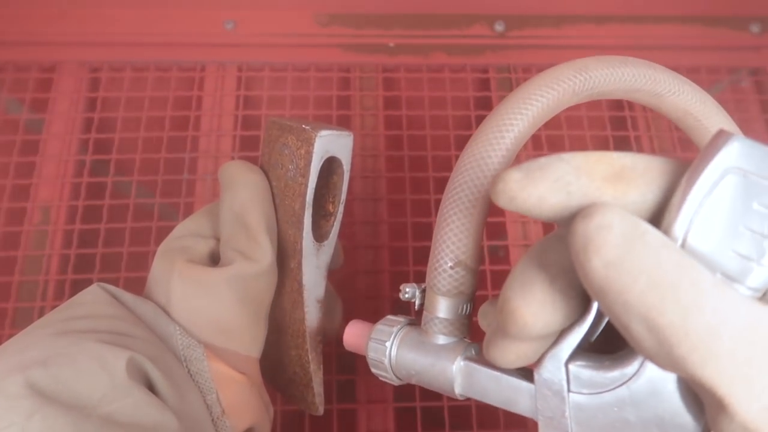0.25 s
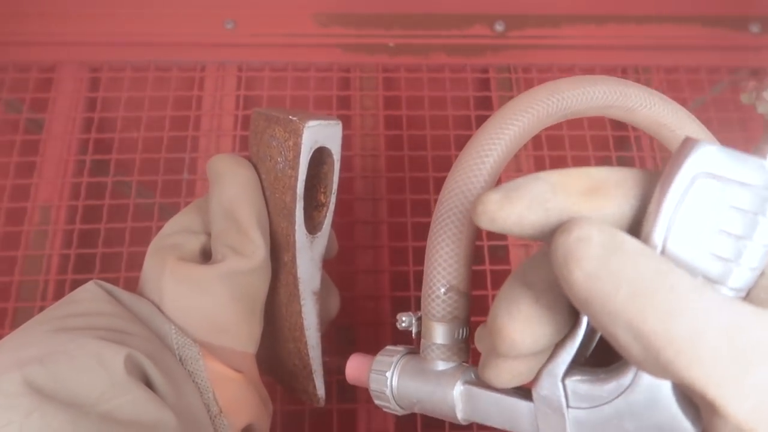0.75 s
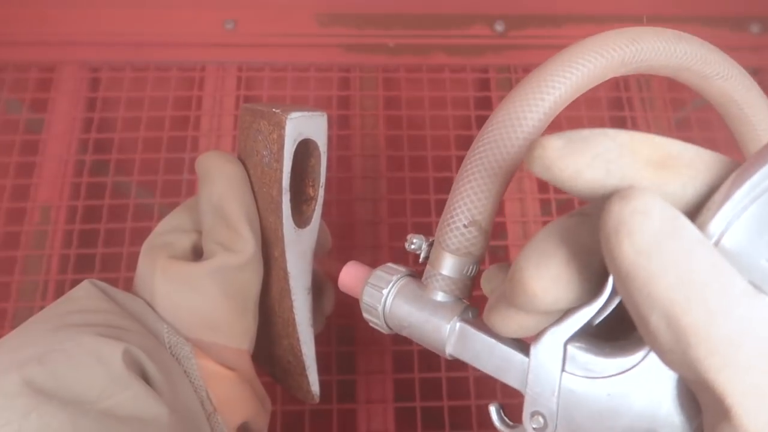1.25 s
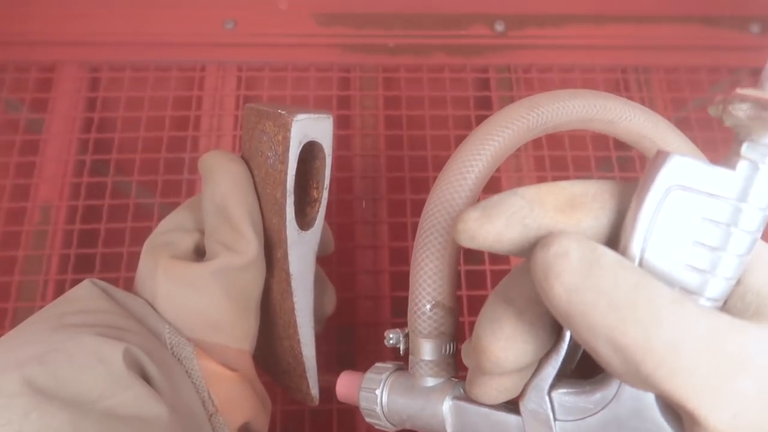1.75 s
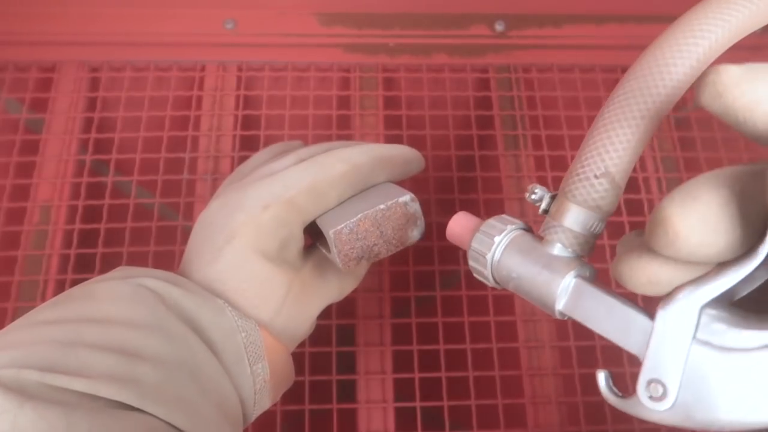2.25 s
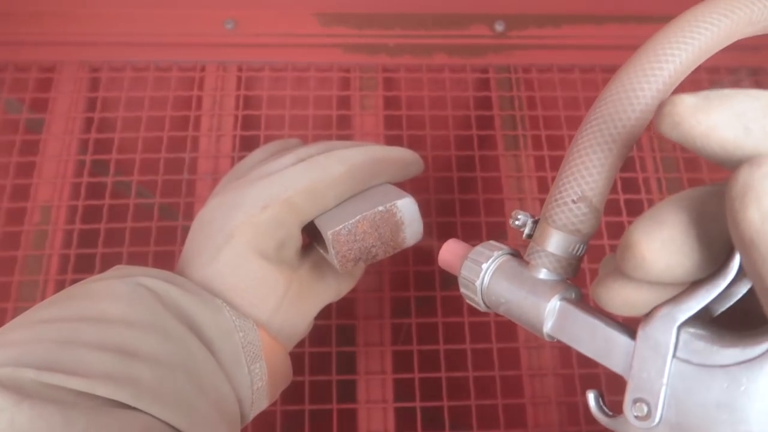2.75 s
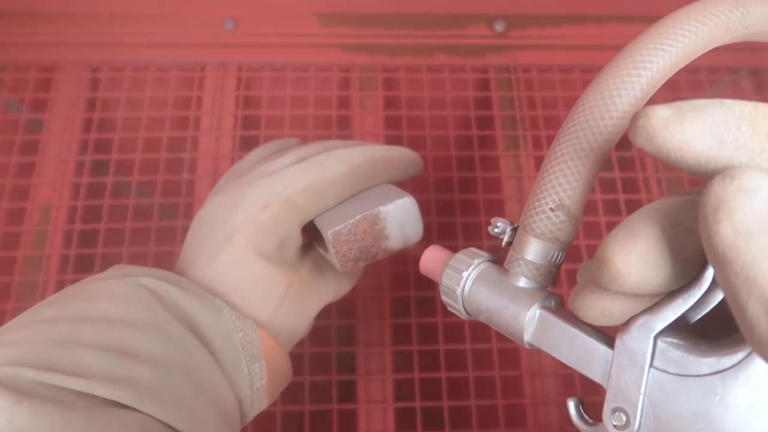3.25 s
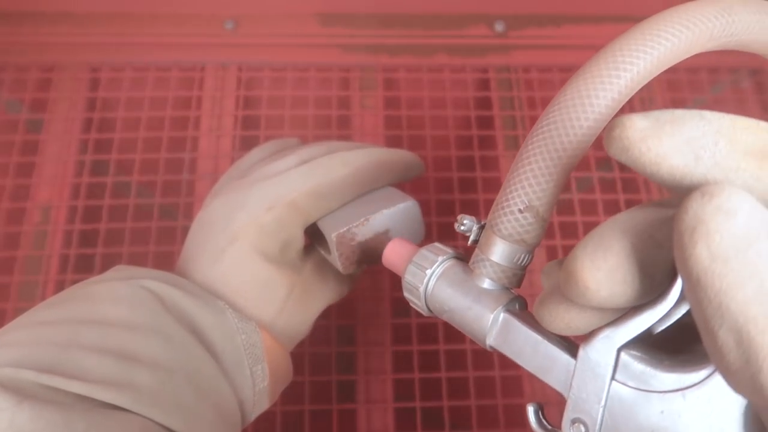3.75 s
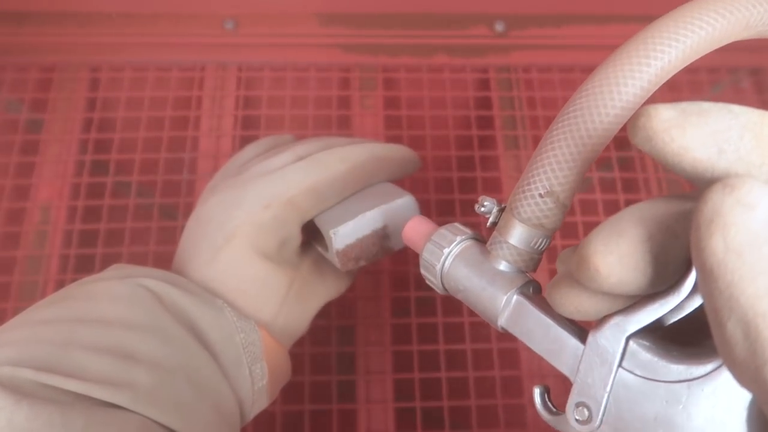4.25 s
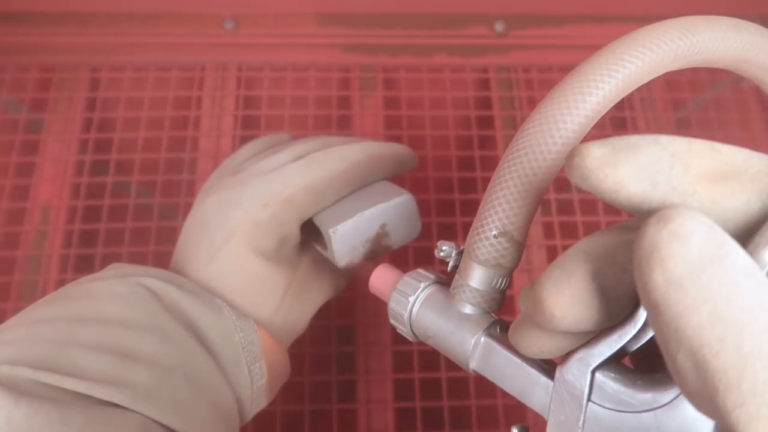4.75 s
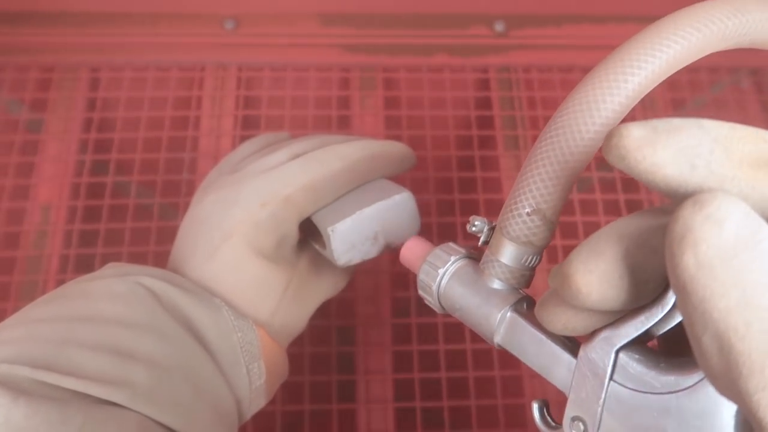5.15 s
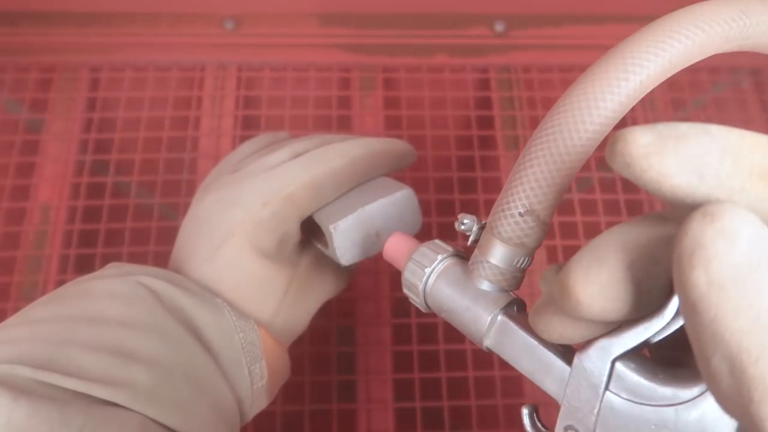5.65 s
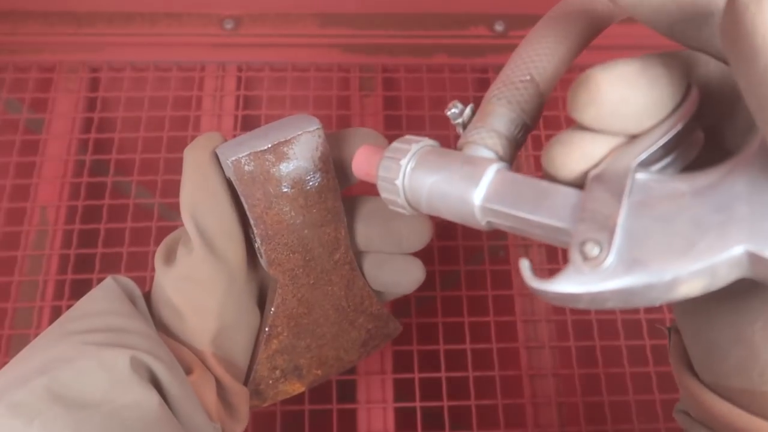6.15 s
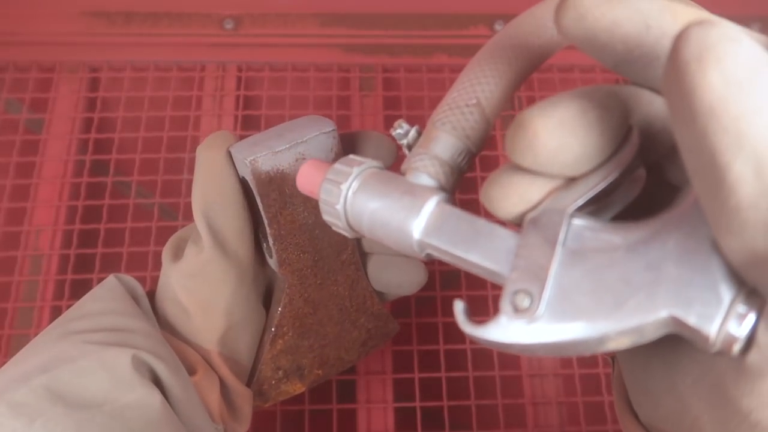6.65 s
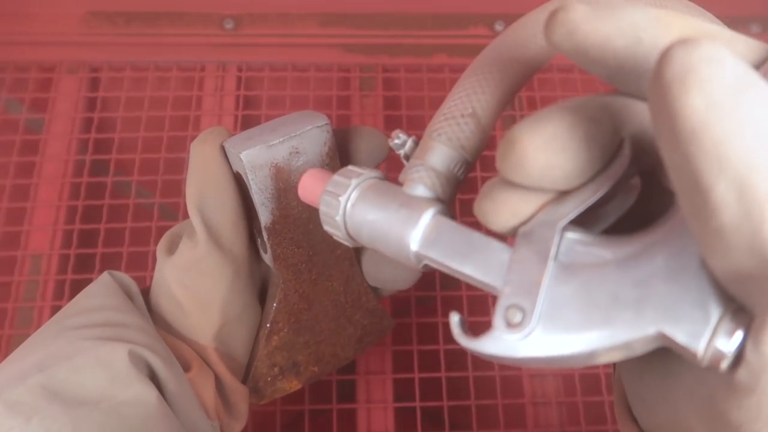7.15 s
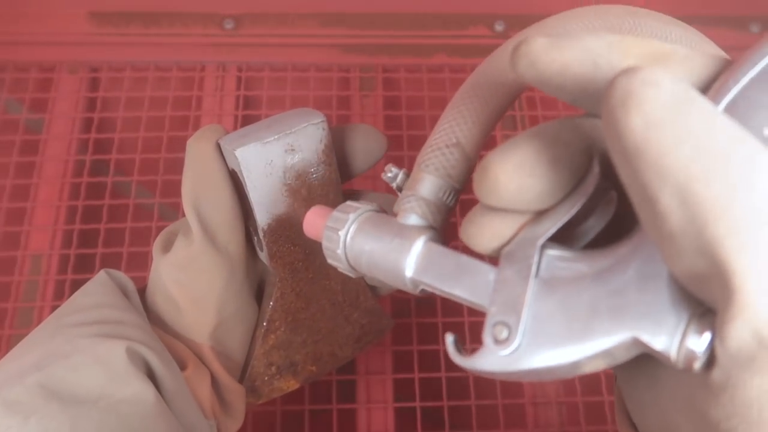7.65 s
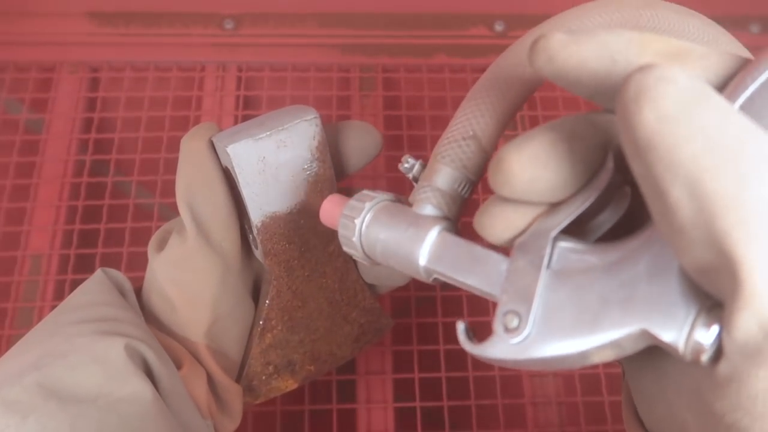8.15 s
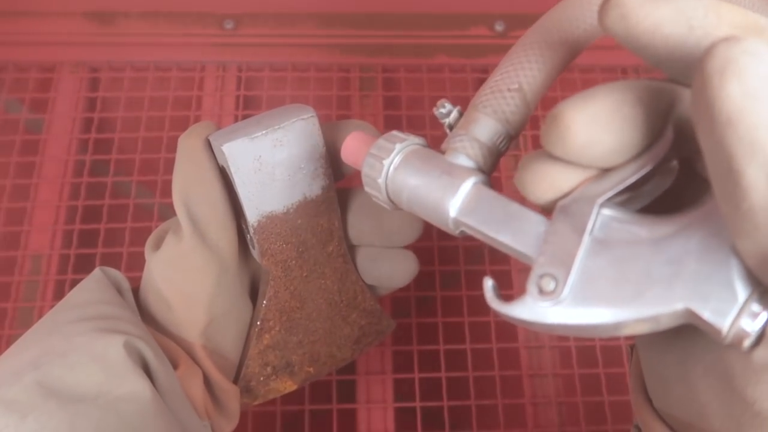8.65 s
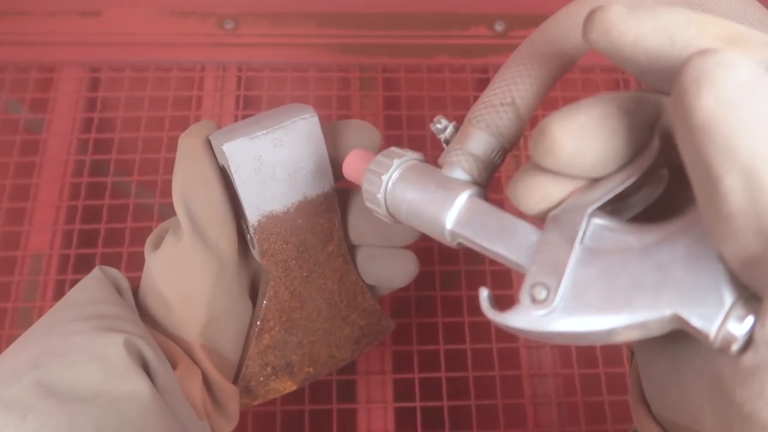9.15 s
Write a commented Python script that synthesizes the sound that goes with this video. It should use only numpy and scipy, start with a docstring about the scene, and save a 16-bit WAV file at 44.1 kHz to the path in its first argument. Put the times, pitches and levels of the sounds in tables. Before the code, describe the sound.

A sandblasting gun runs from the start and never stops, heard close inside a closed steel cabinet. Its air jet is a steady, slightly fluttering hiss over a hollow, boxy roar, with a thin ring and a faint high nozzle whistle. Behind it a pump buzzes and a dust extractor whines throughout.

Grit sizzles on a rusty axe head, brightening briefly at the start and around 1.3 seconds, where an edge sings in a short spurt. The high spray dips at about 2 seconds, with faint low bumps of air, then flares at 2.3, 4.9 and 5.6 seconds.

Just before 6 seconds, jet and machines step down slightly together. Blasting continues, with brighter sizzles and brief singing spurts around 7, 7.5 and 9.1 seconds, until the end at about 9.4 seconds.

```python
"""Inside a closed steel cabinet, a rusty axe head is sandblasted.
The air jet hisses and roars in the box's resonances, and the grit sizzles brighter where it meets the
steel squarely. The gun rings thinly, the nozzle whistles and edges of the steel sing in short spurts.
Behind it a pump buzzes, the dust extractor whines and stray air bumps softly.
Just before six seconds the jet, grit, whistle and machines step down in level together."""
import sys
import numpy as np
from scipy import signal
from scipy.fft import rfft, irfft, next_fast_len
from scipy.io import wavfile

SR = 44100
rng = np.random.default_rng(int(sys.argv[2]) if len(sys.argv) > 2 else 0)


def transcribe(signal):
    """Save signal, clipped to [-1, 1], as a 16-bit WAV file at the path in sys.argv[1]."""
    frames = np.atleast_2d(signal).T
    limited = np.clip(frames, -1, 1)
    pcm = np.round(limited * 32767).astype(np.int16)
    wavfile.write(sys.argv[1], SR, pcm)


N = 414981
TIME = np.arange(N) / SR
FFT_SIZE = next_fast_len(N)
FREQS = np.maximum(np.arange(FFT_SIZE // 2 + 1) * SR / FFT_SIZE, 1)

# the extractor's blade tone, following its speed: time_s, pitch_hz
BLADE_PITCH = [(0.0, 14964), (2.38, 14920), (4.04, 14938), (4.27, 15003), (4.9, 15003), (5.16, 14914),
               (6.4, 14872), (6.79, 14805), (7.52, 14864), (9.41, 14875)]
# the fader ride on that tone: time_s, level_db
BLADE_LEVEL = [(0, -44), (.6, -42.5), (3.5, -44.2), (4.6, -45.5), (5.4, -45.5), (5.85, -44), (6.7, -46.5),
               (8, -46.6), (9.41, -44)]
# the jet sweeps squarely over the steel: centre_s, width_s, grit_db, spray_db
JET_SWEEPS = [(0.0, .07, -48, -44), (1.25, 0.1, -48, -45), (2.27, 0.073, -50, -43), (4.91, 0.046, -46, -58),
              (5.64, 0.037, -45, -47), (5.83, .05, -55, -50), (7.04, 0.14, -43, -43),
              (7.48, 0.072, -42, -58), (8.05, .07, -49, -58), (9.12, .06, -45, -54)]


def from_db(db):
    """Decibels to gain."""
    return 10 ** (np.asarray(db) / 20)


def unit_rms(x):
    """Scale to an rms of one."""
    return x / np.sqrt(np.mean(x ** 2) + 1e-20)


def over_time(points):
    """An automation curve, read at every sample."""
    return np.interp(TIME, *np.transpose(points))


def over_hz(points):
    """An EQ curve, joined by straight lines in log frequency."""
    hz, value = np.transpose(points)
    return np.interp(np.log(FREQS), np.log(hz), value)


def swell(centre_s, width_s):
    """A smooth rise and fall around one moment."""
    return np.exp(-.5 * ((TIME - centre_s) / width_s) ** 2)


def gate(start_s, end_s, fade_s=.02):
    """Open between two moments, with short fades."""
    return np.clip(np.minimum(TIME - start_s, end_s - TIME) / fade_s + .5, 0, 1)


def drift(rate_hz):
    """A slow random wander with an rms of about one."""
    hop, run_in = 100, 2000
    pole = np.exp(-2 * hop * np.pi * rate_hz / SR)
    noise = rng.standard_normal(N // hop + run_in + 2)
    slow = signal.lfilter([1], [1, -2 * pole, pole * pole], noise)[run_in:]
    return np.interp(np.arange(N) / hop, np.arange(len(slow)), unit_rms(slow))


def running_phase(hz):
    """Phase of a rotation that starts anywhere."""
    return 2 * np.pi * (np.cumsum(hz) / SR + rng.random())


def tone(phase, level_db):
    """A sine of the given rms level."""
    return np.sqrt(2) * from_db(level_db) * np.sin(phase)


def breathy_tone(pitch_hz, width_hz):
    """A whistle fed by turbulence: noise in a narrow band."""
    phase = running_phase(np.full(N, pitch_hz))
    return unit_rms(drift(width_hz) * np.sin(phase) + drift(width_hz) * np.cos(phase))


def stereo_colour(excitation, colour_db):
    """EQ two unrelated signals as mid and side; the image is widest in the treble."""
    # stereo width: frequency_hz, side_minus_mid_db
    stereo_width = [(200, -64), (380, -30), (700, -62), (1000, -9.5), (1700, -45), (2500, -18),
                    (4000, -22.5), (6000, -12), (8000, -8), (10500, -2.5), (15000, -2)]
    mid, side = rfft(excitation, FFT_SIZE) * from_db(colour_db)
    side = side * from_db(over_hz(stereo_width))
    mid, side = irfft(np.array([mid, side]), FFT_SIZE)[:, :N]
    return np.array([mid + side, mid - side]) / np.std(mid)


def air_band(centre_hz, bandwidth_hz):
    """Stereo noise in one band with soft skirts."""
    band_db = -20 * np.log10(1 + (2 * (FREQS - centre_hz) / bandwidth_hz) ** 2)
    return stereo_colour(rng.standard_normal((2, N)), band_db)


def cabinet_eq(echo_count=24):
    """The resonances as a curve in dB, finely rippled by many short wall echoes."""
    # peaks and hollows of the cabinet, gun and steel: centre_hz, width_hz, gain_db
    resonances = [(141, 13, 3), (253, 4.2, 15.5), (402.5, 14, 6.5), (617.5, 19, 6), (675, 65, 4.5),
                  (765, 32, 9), (917.5, 61, 11), (1150, 41, 4.5), (1212, 16, 7.5), (1302, 6.6, 8),
                  (1475, 33, 10), (1752, 125, 6.5), (1900, 70, 4.5), (2220, 48, 7.5), (2471, 78, 10),
                  (2650, 33, 3), (2886, 58, 8), (2986, 37, 3), (3200, 54, 3), (3420, 49, 2.5),
                  (3753, 76, 5.5), (3880, 90, 5), (4495, 136, 9), (5290, 150, 5.5), (5750, 170, 5),
                  (8300, 71, 2), (9070, 52, 6), (10450, 190, 4.5), (575, 27, -5), (1500, 70, -3.5),
                  (4150, 200, -1.5)]
    peaks_db = sum(db / (1 + (2 * (FREQS - hz) / width) ** 2) for hz, width, db in resonances)
    echoes = np.zeros(FFT_SIZE)
    echoes[0] = 1
    delays_s = rng.uniform(.003, .025, echo_count)
    echoes[(delays_s * SR).astype(int)] = .05 * rng.choice([-1, 1], echo_count)
    return peaks_db + 20 * np.log10(np.abs(rfft(echoes)))


def air_puffs(band_hz=(35, 90)):
    """Deflected air gives soft low bumps."""
    # stray puffs: centre_s, width_s, level_db
    puffs = [(1.95, .02, -73), (2.24, .03, -66), (5.04, .05, -73), (6.03, .02, -68)]
    envelope = sum(from_db(level_db) * swell(s, width) for s, width, level_db in puffs)
    low_band = signal.butter(2, band_hz, "band", fs=SR, output="sos")
    return envelope * unit_rms(signal.sosfilt(low_band, rng.standard_normal(N)))


def pump(jitter_hz=.047, waver_db=.78, scatter_rad=.077, smear_rad=.5):
    """Each stroke starts a buzz of harmonics; the box smears them and moving hands make them waver."""
    # the pump's pace: time_s, strokes_per_s
    stroke_rate = [(0, 115.1), (1.5, 115.2), (2.4, 114.8), (3.2, 114.9), (4.5, 115.25), (5.4, 115.02),
                   (6.8, 114.92), (9.41, 115.05)]
    # its buzz: harmonic, level_db
    harmonics = [(1, -61.5), (2, -51), (3, -53.5), (4, -72.5), (5, -53), (7, -47.5), (8, -43.5), (9, -50),
                 (10, -54.5), (15, -47.5), (17, -55.5), (24, -56), (25, -58.5), (26, -59.5), (28, -61.5),
                 (30, -58)]
    # a panel ringing with the sixteenth harmonic: time_s, level_db
    panel_ring = [(0, -50), (.2, -43.5), (1.9, -44.5), (2.02, -54.5), (4.5, -42.5), (6.6, -51),
                  (9.41, -49.5)]
    stroke = running_phase(over_time(stroke_rate) + jitter_hz * drift(8.4))
    buzz = np.zeros(N)
    for harmonic, level_db in harmonics + [(16, over_time(panel_ring))]:
        phase_shift = smear_rad * rng.standard_normal() + scatter_rad * drift(3.6)
        buzz += tone(harmonic * stroke + phase_shift, level_db + waver_db * drift(6.2))
    return buzz


def extractor(jitter_hz=2.5, waver_db=1.0, whine_trim_db=2.5, right_phase_rad=.36, overtone_db=-60):
    """The fan's thin blade whine, over the motor's note and one high overtone of that note."""
    # the motor's note: time_s, level_db
    motor_level = [(0, -45.5), (3.7, -44), (4.4, -42.3), (6.4, -47.5), (6.8, -53), (7.5, -46.5),
                   (9.41, -47)]
    blade_phase = running_phase(over_time(BLADE_PITCH) + jitter_hz * drift(21.5))
    motor_phase = blade_phase / 12
    whine_db = over_time(BLADE_LEVEL) + whine_trim_db
    # the whine's short waves reach each side with a phase and a waver of their own
    whine = np.array([tone(blade_phase + shift, whine_db + waver_db * drift(40))
                      for shift in (0, right_phase_rad)])
    motor = tone(motor_phase, over_time(motor_level) + .5 * drift(2.8))
    overtone = tone(9 * motor_phase, overtone_db + 3 * drift(20))
    return whine + motor + overtone


def fan_hiss(bandwidth_hz=1700, trim_db=-6):
    """Unsteady air spreads a skirt of hiss around the blade tone."""
    centre_hz = np.mean(over_time(BLADE_PITCH))
    return from_db(over_time(BLADE_LEVEL) + trim_db) * air_band(centre_hz, bandwidth_hz)


def gun_ring(pitch_hz=5215, width_hz=23, level_db=-53.5):
    """Air rushing through the gun keeps one of its resonances sounding."""
    return from_db(level_db) * breathy_tone(pitch_hz, width_hz)


def nozzle_whistle(width_hz=28, waver_db=2):
    """A faint, unsteady edge tone holds one pitch, breaks off and returns lower."""
    # held whistles: start_s, end_s, pitch_hz, level_db
    notes = [(-.2, 5.08, 9745, -53.5), (5.8, 9.6, 9670, -54.8)]
    whistle = sum(from_db(level_db) * gate(start, end) * breathy_tone(hz, width_hz)
                  for start, end, hz, level_db in notes)
    return whistle * from_db(waver_db * drift(2.8))


def edge_spurts():
    """Air split by an edge of the steel sings briefly in a broad band."""
    # the jet catches an edge: centre_s, width_s, centre_hz, bandwidth_hz, level_db
    spurts = [(1.293, .018, 6100, 700, -42), (1.278, .045, 7100, 2600, -44.3), (6.93, .05, 5650, 600, -47),
              (7.13, .04, 5500, 700, -50), (7.47, .05, 13200, 1400, -54.5), (9.13, .045, 5450, 900, -50)]
    return sum(from_db(level_db) * swell(s, width) * air_band(hz, bandwidth)
               for s, width, hz, bandwidth, level_db in spurts)


def grit(cabinet_db, grains_per_s=9000, glancing_db=-57, clump_db=3):
    """Thousands of grains tick on the steel each second, in clumps, and harder in each sweep."""
    # the sizzle's colour: frequency_hz, gain_db
    grit_eq = [(2500, -30), (4700, -3.5), (5200, -6), (5900, 4.5), (6400, -4), (7500, -3), (9500, -14),
               (11800, -6), (13400, -11), (14500, -24)]
    ticks = (rng.random((2, N)) < grains_per_s / SR) * rng.standard_normal((2, N))
    sizzle = stereo_colour(ticks, over_hz(grit_eq) + cabinet_db)
    sweep_power = sum((from_db(db) * swell(s, width)) ** 2 for s, width, db, _ in JET_SWEEPS)
    envelope = np.sqrt(from_db(glancing_db) ** 2 + sweep_power)
    return sizzle * envelope * from_db(clump_db * drift(8.7))


def air_jet(cabinet_db, roar_db=-36.5, hiss_db=-40.6, spray_db=-47.5, flutter_db=.67):
    """With the trigger held, turbulence roars in the box, hisses at the nozzle and sprays off steel."""
    # the colours of the three layers: frequency_hz, gain_db
    roar_eq = [(20, -47), (60, -31.5), (102, -33), (130, -19), (310, -17), (370, -9.5), (560, -7.5),
               (620, -3), (900, -3), (1020, -7), (1400, -7), (1600, -10.5), (2300, -19.5), (5000, -31.5)]
    hiss_eq = [(300, -25), (1000, -17), (2000, -2.5), (3700, 0.5), (4200, -1), (7000, -0.5), (10500, -5.5),
               (11800, -9), (16000, -35)]
    spray_eq = [(3000, -29), (6000, -1), (8000, 3.5), (10600, 3), (11700, 0.5), (13000, 4), (16000, 0)]
    # roar and hiss swell briefly: centre_s, width_s, rise_db
    surges = [(4.32, 0.093, 0.9), (5.87, .06, 0.9), (8.3, .2, 0.7)]
    # the jet is off the steel while the axe head is turned: start_s, end_s, spray_change_db
    axe_turn = (1.96, 2.2, -9)
    roar, hiss, spray = (stereo_colour(rng.standard_normal((2, N)), over_hz(eq) + cabinet_db)
                         for eq in (roar_eq, hiss_eq, spray_eq))
    surge_db = sum(rise_db * swell(s, width) for s, width, rise_db in surges)
    build_db = -2.5 * np.exp(-TIME / .1)  # the pressure builds at the start
    hiss_gain = from_db(hiss_db + surge_db + build_db)
    start_s, end_s, spray_change_db = axe_turn
    turn_duck = from_db(spray_change_db * gate(start_s, end_s))
    sweep_power = sum((from_db(db) * swell(s, width)) ** 2 for s, width, _, db in JET_SWEEPS)
    spray_gain = np.sqrt(from_db(spray_db) ** 2 + sweep_power) * turn_duck
    flutter = from_db(flutter_db * drift(25))  # the grit feeds unevenly
    return roar * from_db(roar_db + surge_db) + flutter * (hiss * hiss_gain + spray * spray_gain)


def scene(step_s=5.908, step_fade_s=.011, step_db=-4):
    """Jet, grit, whistle and machines share a bed that steps down; ring, spurts and puffs ride on top."""
    cabinet_db = cabinet_eq()
    bed = air_jet(cabinet_db) + grit(cabinet_db) + nozzle_whistle() + pump() + extractor() + fan_hiss()
    fader = from_db(step_db * np.clip((TIME - step_s) / step_fade_s, 0, 1))
    return fader * bed + gun_ring() + edge_spurts() + air_puffs()


def record(dry):
    """The right side is nearer the gun, so its treble is earlier and louder; the top is cut steeply."""
    # the treble leans right: frequency_hz, left_minus_right_db
    balance = [(1000, 0), (2400, -.1), (4400, -.6), (8000, -1.1), (15000, -1.6)]
    left_lag_s, cutoff_hz = 8e-6, 15750
    sides = np.array([[.5], [-.5]])
    pan = from_db(sides * over_hz(balance))
    delay = np.exp(-2j * np.pi * FREQS * left_lag_s * sides)
    low_pass = 1 / np.sqrt(1 + (FREQS / cutoff_hz) ** 600)
    return irfft(rfft(dry, FFT_SIZE) * pan * delay * low_pass, FFT_SIZE)[:, :N]


dry = scene()
out = record(dry)
transcribe(out)
```